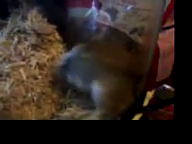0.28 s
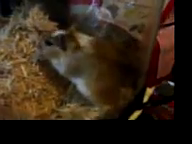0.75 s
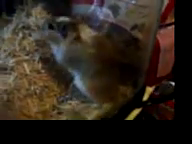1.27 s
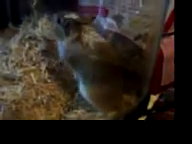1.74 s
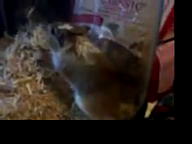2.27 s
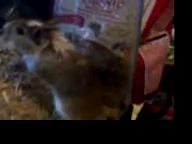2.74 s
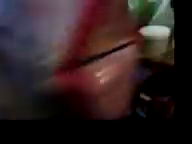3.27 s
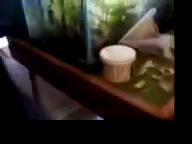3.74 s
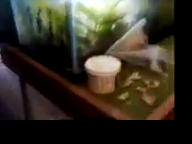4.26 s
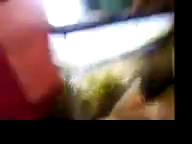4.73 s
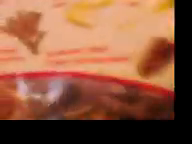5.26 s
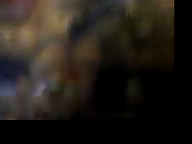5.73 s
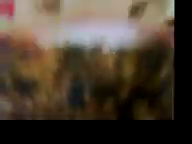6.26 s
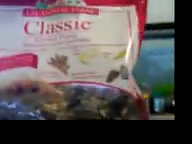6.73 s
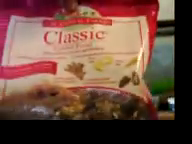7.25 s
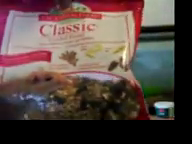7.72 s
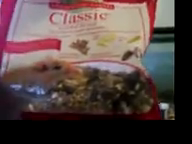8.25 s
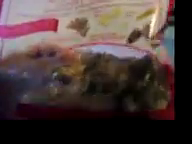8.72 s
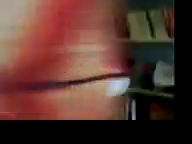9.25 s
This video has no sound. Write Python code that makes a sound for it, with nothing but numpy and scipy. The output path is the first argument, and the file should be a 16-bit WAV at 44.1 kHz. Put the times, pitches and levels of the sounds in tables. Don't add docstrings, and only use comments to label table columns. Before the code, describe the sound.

Dull narrow-band noise with steady ticking; small claw knocks ring glass, loud overloaded handling bursts follow, then sparse soft finger taps and rubbing.

```python
import sys
import numpy as np
from scipy import signal
from scipy.fft import rfft, irfft
from scipy.io import wavfile
from scipy.ndimage import uniform_filter1d

SR = 44100
rng = np.random.default_rng(int(sys.argv[2]) if len(sys.argv) > 2 else 0)


def to_wav(sig):
    pcm = np.clip(np.atleast_2d(sig), -1, 1) * 32767
    pcm = np.round(pcm).astype(np.int16)
    wavfile.write(sys.argv[1], SR, pcm.T)


def rack_gain(trim_db):
    fader = np.asarray(trim_db, float)
    return 10 ** (fader / 20)


N = 418068


def evened(x):
    return x / np.sqrt(np.mean(x ** 2) + 1e-20)


def peaked(x):
    return x / abs(x).max()


def read(points, hz):
    point_hz, value = np.transpose(points)
    return np.interp(np.log(hz + 1), np.log(point_hz + 1), value)


def add(mix, start_s, sound):
    part = mix[round(start_s * SR):][:len(sound)]
    part += sound[:len(part)]


# pitch_hz, density_db_per_hz
HISS = [(15, 1), (60, -11), (170, -3), (420, -7.5), (800, -11), (1500, -12), (3500, -15), (4600, -16.5)]


def hiss(level_db=-45):
    hz = np.fft.rfftfreq(N, 1 / SR)
    spectrum = rfft(rng.standard_normal(N)) * rack_gain(read(HISS, hz))
    return rack_gain(level_db) * evened(irfft(spectrum, N))


# multiple, level_db (rms)
HUM = [(1, -61), (2, -59.5), (3, -58.5), (4, -63.5), (5, -62), (6, -72), (7, -71.5), (10, -68), (11, -71.5),
       (12, -66)]


def hum(mains_hz=59.836):
    t = np.arange(N) / SR
    return sum(np.sqrt(2) * rack_gain(db) * np.cos(2 * np.pi * round(k) * mains_hz * t) for k, db in HUM)


# after_spike_ms, jump (re spike), recovery_ms
SAG = [
    (-1.7, -.2, .5),
    (.3, .33, 4.0),
    (4.4, -.3, 1.5),
]


def ticks(first_s=.0062, period_s=.0524605, level_db=-32, wobble=0.37, spike_ms=0.094):
    out = np.zeros(N)
    ms = np.arange(-150, 700) * 1000 / SR
    tick = -np.exp(-(ms / spike_ms) ** 2)
    for at_ms, jump, recovery_ms in SAG:
        tick = tick + jump * (ms > at_ms) * np.exp(-abs(ms - at_ms) / recovery_ms)
    starts_s = np.arange(first_s, N / SR, period_s)
    for start_s, chance in zip(starts_s, rng.standard_normal((len(starts_s), 2))):
        late_s = abs(chance[0]) * .0001
        add(out, start_s - 150 / SR + late_s, rack_gain(level_db) * (1 + wobble * chance[1]) * tick)
    return out


# start_s, pitch_hz, level_db (rms)
WHINES = [(0.049, 1440, -46.5), (.837, 1463, -46.5), (1.1635, 1450, -45), (1.811, 1424, -47.5),
          (3.514, 1465, -47.5), (4.625, 1490, -51), (4.800, 1430, -47), (5.24, 1460, -47.5),
          (6.825, 1480, -45.5), (6.979, 1464, -47.5), (7.802, 1440, -46.5), (8.081, 1443, -47.5),
          (8.704, 1420, -46.5)]


def whines(waver_hz=35, long_s=.0148, gap_s=.0035, short_s=.0075):
    out = np.zeros(N)
    t = np.arange(round((long_s + gap_s + short_s) * SR)) / SR
    gate = uniform_filter1d(1. * ((t < long_s) | (t > long_s + gap_s)), 30)
    for (start_s, hz, db), drift in zip(WHINES, rng.standard_normal((len(WHINES), len(t)))):
        wander_hz = waver_hz * evened(uniform_filter1d(drift, 150))
        phase = 2 * np.pi * np.cumsum(hz + wander_hz) / SR
        add(out, start_s, np.sqrt(2) * rack_gain(db) * gate * np.sin(phase))
    return out


def resonate(x, hz, width_hz):
    r = np.exp(-np.pi * width_hz / SR)
    return signal.lfilter([1 - r, 0, r - 1], [1, -2 * r * np.cos(2 * np.pi * hz / SR), r * r], x)


def gliding(x, hz, width_hz):
    turn = np.exp(2j * np.pi * np.cumsum(hz) / SR)
    r = np.exp(-np.pi * width_hz / SR)
    return (turn * signal.lfilter([1], np.convolve([1, -r], [1, -r]), x / turn)).real


def body(x, modes):
    out = 0
    for k, (hz, width_hz, db) in enumerate(modes):
        once = resonate(x, hz, width_hz * 3.8)
        out = out + (-1) ** k * rack_gain(db) * resonate(once, hz, width_hz * 3.8)
    return out


# pitch_hz, width_hz, level_db
CASE = [(279, 448, 0), (490, 266, 10), (667, 48, -18), (816, 73, 0)]


def hollow_case(x):
    return body(x, CASE)


# pitch_hz, width_hz, level_db
SHAVINGS = [(1445, 160, 17.5), (2140, 740, 10.5), (2784, 320, 17.5), (3500, 200, -23)]


def dry_shavings(x):
    return body(x, SHAVINGS)


# pitch_hz, width_hz, level_db
PALM = [(176, 93, -8.5), (261, 86, 1), (338, 101, 2), (440, 77, 0.5)]


def pressed_case(x):
    return body(x, PALM)


# middle_s, length_s, rub_db, rustle_db (re rub), grip_hz
STROKES = [(0.01, 0.25, -48, -18, 540), (.62, 0.52, -50, -14, 540), (2.551, .2, -55.5, -8, 630),
           (2.792, 0.14, -33, -16, 800), (3.065, 0.37, -55.5, 3, 706), (3.162, 0.17, -48.5, -17, 820),
           (3.364, 0.49, -45, -24, 682), (3.795, .09, -37.5, -21, 517), (3.968, 0.13, -17.5, -9.5, 524),
           (4.118, 0.17, -23.5, -6.5, 540), (4.95, 0.26, -50.5, -1.5, 597), (5.386, .45, -51, -9.5, 589),
           (5.703, 0.19, -55, -6, 595), (6.067, 0.31, -57, -1.5, 585), (6.65, .45, -53, -8.5, 567),
           (7.026, .3, -46, -26, 565), (8.832, 0.13, -55, -41, 580), (8.989, 0.59, -44.5, -14.5, 560),
           (9.461, 0.67, -47, -14, 578)]


def strokes(t, edge_db=-11, squareness=1.8):
    return [(db + edge_db * abs(2 * (t - middle_s) / length_s) ** squareness, dry_db, hz)
            for middle_s, length_s, db, dry_db, hz in STROKES]


# start_s, rub_db, fall_db_per_s, rustle_db (re rub), grip_hz
SLIDES = [(.4, -41.5, 452, 11, 757), (2.762, -44.5, 86.5, 7.5, 860), (2.885, -48.5, 143.5, 5.5, 740),
          (3.135, -51.5, 149.5, 6, 716), (3.765, -38.5, 120, 1, 530), (3.863, -22, 152.5, -17, 495),
          (4.076, -19.5, 126.5, -7.5, 540), (4.255, -22.5, 71, -7, 728), (4.308, -15, 117, -13, 613),
          (4.451, -35.5, 132, -6.5, 531), (4.54, -44.5, 33, -17.5, 520), (5.1, -36.5, 133.5, -12.5, 524),
          (6.24, -46, 58, -15, 497), (6.852, -41, 87, -8.5, 545), (8.347, -46, 49, 1.5, 560),
          (8.428, -34, 173, 2.5, 620)]


def slides(t):
    return [(np.where(t >= start_s, db - fall * (t - start_s), -200), dry_db, hz)
            for start_s, db, fall, dry_db, hz in SLIDES]


def hand(press_db=-1.5, press_db_per_octave=-33.5, press_at_hz=540, hold_db=-59.5):
    t = np.arange(0, N + 64, 64) / SR
    power = np.full((4, len(t)), 1e-12)
    power[2] = rack_gain(hold_db) ** 2
    for level_db, dry_db, hz in strokes(t) + slides(t):
        spot_db = press_db + press_db_per_octave * np.log2(hz / press_at_hz)
        shares = np.array([1, rack_gain(dry_db) ** 2, rack_gain(spot_db) ** 2, hz])
        power += rack_gain(level_db) ** 2 * shares[:, None]
    fine = lambda v: np.interp(np.arange(N) / SR, t, v)
    return [fine(np.sqrt(p)) for p in power[:3]], fine(np.clip(power[3] / power[0], 400, 900))


def slips(per_s, spread_db, smooth_share):
    hit, size, smooth = rng.random(N), rng.exponential(1, N), rng.standard_normal(N)
    clicks = (hit < per_s / SR) * rack_gain(spread_db * np.minimum(size, 4)) * np.sign(smooth)
    return evened(clicks) + smooth_share * smooth


def rubbing(case_share=0.39):
    (rub_gain, rustle_gain, press_gain), grip_hz = hand()
    friction = slips(per_s=600, spread_db=2.5, smooth_share=0.9)
    rub = evened(gliding(friction, grip_hz, 220)) + case_share * evened(hollow_case(friction))
    rub = signal.lfilter(*signal.butter(2, 260, "high", fs=SR), rub)
    rustle = dry_shavings(slips(per_s=900, spread_db=3.4, smooth_share=.65))
    rustle = signal.lfilter(*signal.butter(1, 2200, fs=SR), rustle)
    press = pressed_case(slips(per_s=320, spread_db=3.0, smooth_share=0.65))
    return rub_gain * evened(rub) + rustle_gain * evened(rustle) + press_gain * evened(press)


def knock(row, noise, t60_s, case_db=-4, blow_ms=2.05, crack_t60_s=0.017, chatter=0.13, wide=0.089, rattle=0.23):
    start_s, db, hz, crack_db, crack_hz = row
    t = np.arange(noise.shape[1]) / SR
    t60_s = np.clip(t60_s * np.exp(-0.1 * db), .008, .075)
    blow = (1.43 * np.exp(-t / .0004) + noise[0]) * np.exp(-t * 1000 / blow_ms)
    blow = blow + rattle * noise[0] * rack_gain(-45 * t / t60_s)
    blow = signal.lfilter(*signal.butter(3, 1.24 * hz, fs=SR), blow)
    spot = resonate(resonate(blow, hz, 11. / t60_s), hz, hz * 1.3)
    ring = peaked(spot) + rack_gain(case_db) * peaked(hollow_case(blow))
    burst = (t == 0) + chatter * noise[1] * rack_gain(-60 * t / crack_t60_s)
    burst = signal.lfilter(*signal.butter(3, 1.49 * crack_hz, fs=SR), burst)
    crack = peaked(resonate(resonate(burst, crack_hz, 800), crack_hz, 1300))
    crack = crack + wide * peaked(dry_shavings(burst))
    return start_s + .0016, rack_gain(db) * (peaked(ring) + rack_gain(crack_db) * peaked(crack))


def knock_all(rows, t60_s):
    out = np.zeros(N)
    for row, noise in zip(rows, rng.standard_normal((len(rows), 2, 6000))):
        add(out, *knock(row, noise, t60_s))
    return out


# start_s, peak_db, ring_hz, crack_db (re ring), crack_hz
CLAWS = [(.4005, -20.5, 750, -11, 2930), (.405, -17.5, 930, -2, 2000), (.4125, -18, 760, -12, 1700),
         (.4204, -16.5, 850, 14.5, 2370), (.4282, -20.5, 930, 13, 1730), (2.726, -22.5, 930, -8.5, 1560),
         (2.762, -22, 950, -8, 2280), (2.785, -27, 740, -3, 1890), (2.797, -22.5, 800, -8, 2290),
         (2.806, -16, 914, -17, 2325), (2.823, -30, 785, -9, 2300), (2.8615, -25, 607, -3, 1500),
         (2.8698, 7, 747, -9, 1900), (2.8735, 10, 794, -10.5, 2850), (2.8775, 5.5, 840, -11, 1500),
         (2.973, -21, 937, -0.5, 2180), (3.006, -21.5, 660, 2, 1690), (3.0152, -15.5, 750, -7.5, 2680),
         (3.074, -20.5, 815, -4.5, 2340), (3.14, -29.5, 700, -4, 2600), (3.147, -28, 720, 10, 2600),
         (3.163, -21, 864, 10.5, 1240), (3.174, -22.5, 840, 0.5, 2290), (3.427, -10.5, 763, 3.5, 1680)]


def claws():
    return knock_all(CLAWS, t60_s=0.039)


def decaying_tone(hz, db, t60_s):
    t = np.arange(SR // 4) / SR
    rise = 1 - np.exp(-t * hz * 27.0)
    return rack_gain(db - 60 * t / max(t60_s, .01)) * rise * np.sin(2 * np.pi * hz * t)


# start_s, pitch_hz, peak_db, t60_s
PINGS = [
    (.430, 2550, -39, .22),
    (0.429, 1600, -48, .2),
    (.430, 2030, -46, .12),
    (2.765, 2310, -41, .18),
    (2.87, 45, -20.5, 0.029),
    (2.663, 1567, -38, 0.22),
    (2.664, 2035, -28, 0.14),
    (2.664, 2500, -46, 0.12),
]


def glass_pings():
    out = np.zeros(N)
    for start_s, hz, db, t60_s in PINGS:
        add(out, start_s, decaying_tone(hz, db, t60_s))
    return out


# start_s, peak_db, pitch_hz, t60_s
THUDS = [(2.873, -9.5, 111, 0.021), (3.428, -37, 248, 0.037), (3.767, -33, 148, 0.093),
         (3.868, -19.5, 254, 0.14), (3.908, -21.5, 257, 0.11), (3.979, -35, 214, 0.055),
         (4.082, -40.5, 250, 0.044), (4.283, -20, 192, 0.096), (5.092, -21.5, 200, 0.049),
         (5.251, -31, 114, 0.18), (5.352, -30, 113, 0.06), (5.988, -27, 191, 0.037),
         (6.251, -20.5, 255, 0.043), (9.049, -32, 186, 0.035)]


def thuds():
    out = np.zeros(N)
    for start_s, db, hz, t60_s in THUDS:
        add(out, start_s, decaying_tone(hz, db, t60_s))
    return out


# start_s, peak_db, ring_hz, crack_db (re ring)
GRABS = [(3.768, -33, 510, -5), (3.81, -24, 484, -0.5), (3.8525, -21, 477, -5), (3.866, -8, 578, -4.5),
         (3.895, -30, 514, -12.5), (3.91, -5, 504, -22), (3.919, 0, 623, 8.5), (3.924, -9.5, 522, 6.5),
         (3.933, -5.5, 494, -0.5), (3.946, -5.5, 518, -5.5), (3.9625, -11.5, 501, 1.5),
         (3.972, -4, 462, -17.5), (3.978, 2.5, 490, -2.5), (3.985, -3, 493, 3), (4.029, -28, 552, -26),
         (4.074, -20, 690, 5), (4.084, 8.5, 503, -5), (4.129, -6.5, 423, -2.5), (4.256, -7.5, 613, -4.5),
         (4.279, 1.5, 624, -4.5), (4.281, 1, 920, -10), (4.291, 3.5, 828, -6.5), (4.296, 2, 638, -14),
         (4.312, -6, 652, -17), (4.325, -18, 580, -27), (4.349, -10.5, 476, 8), (4.36, -7.5, 405, -20),
         (4.3815, -3.5, 647, -16.5), (4.455, -28, 450, 15), (4.48, -13.5, 428, -6.5)]


def grabs(crack_hz=1750, crack_spread=.12):
    cracks_hz = crack_hz * np.exp(crack_spread * rng.standard_normal(len(GRABS)))
    return knock_all([(*row, hz) for row, hz in zip(GRABS, cracks_hz)], t60_s=0.05)


# start_s, peak_db, ring_hz, crack_db (re ring), crack_hz
TAPS = [(4.909, -27, 600, -3.5, 2100), (4.947, -22.5, 575, -2, 1370), (5.09, -23, 500, 13, 1800),
        (5.0955, -11.5, 520, -14, 2200), (5.205, -43, 610, 14, 1420), (5.25, -16, 640, -27, 1540),
        (5.2585, -23, 640, -21, 1540), (5.351, -31.5, 223, -22, 1500), (5.926, -16.5, 670, -8, 1200),
        (5.984, -21, 574, -9, 1210), (6.246, -12.5, 385, -17, 1205), (6.258, -23, 470, -39, 1520),
        (6.487, -37, 245, 0, 1400), (6.539, -27.5, 815, -4.5, 1980), (6.546, -39.5, 760, 8, 1870),
        (6.8605, -12, 287, -11, 1390), (6.8612, -17, 563, -11, 2000), (8.3475, -16.5, 538, 7, 1770),
        (8.4258, -29.5, 626, 16.5, 3700), (8.428, -18.5, 630, 11, 1860), (8.72, -31.5, 540, -21, 1430),
        (9.047, -29.5, 527, 2.5, 1350), (9.428, -21, 434, -19, 1480), (9.448, -36.5, 920, 4, 1333)]


def taps():
    return knock_all(TAPS, t60_s=0.025)


# pitch_hz, t60_s
ROOM = [(200, 0.27), (550, 0.065), (1400, 0.085), (3600, 0.044)]


def room(x):
    echoes = np.zeros(SR // 2)
    at = np.arange(200, len(echoes) - 20, 20)
    echoes[at + rng.integers(0, 20, len(at))] = rng.choice([-1., 1.], len(at))
    hz, t, z = signal.stft(echoes, SR, nperseg=256)
    decay = rack_gain(-60 * t / read(ROOM, hz)[:, None])
    tail = signal.istft(z * decay, SR, nperseg=256)[1]
    return signal.oaconvolve(x, tail / np.linalg.norm(tail))[:N]


def scene(room_db=-22):
    circuits = hiss() + hum() + ticks() + whines()
    near = rubbing() + claws() + glass_pings() + thuds() + grabs() + taps()
    return (near + rack_gain(room_db) * room(near) + circuits)[None]


def top_cut(x):
    return signal.sosfilt(signal.butter(12, 16790, fs=SR, output="sos"), x)


def record(dry, edge_hz=3986, converter_limit=0.71, ceiling=.705):
    band = signal.firwin(161, edge_hz, window=("kaiser", 7.0), fs=SR)
    overloaded = np.clip(dry, -converter_limit, converter_limit)
    narrow = signal.oaconvolve(overloaded, band[None], "same")
    clipped = np.clip(narrow, -ceiling, ceiling)
    rounded = signal.oaconvolve(clipped, [[.12, .76, .12]], "same")
    return top_cut(rounded + .0008)


dry = scene()
out = record(dry)
to_wav(out)
```